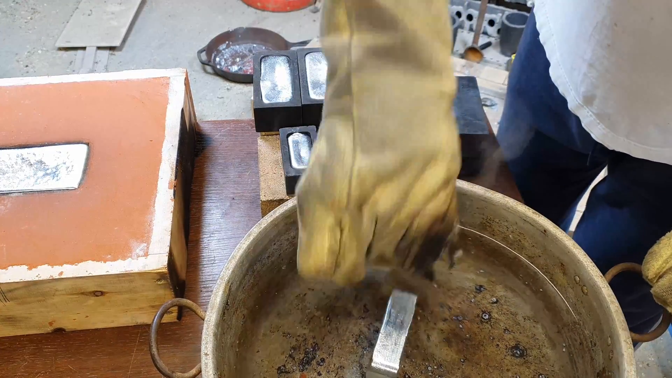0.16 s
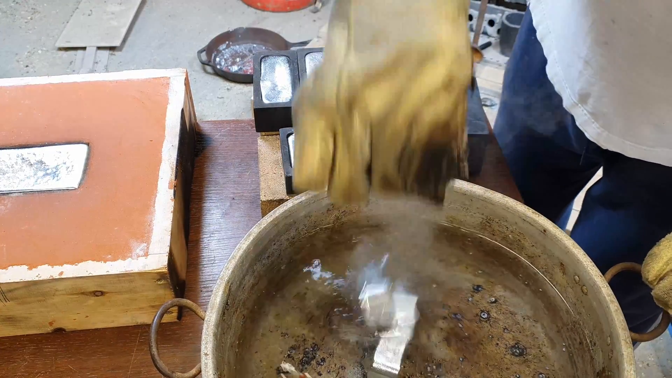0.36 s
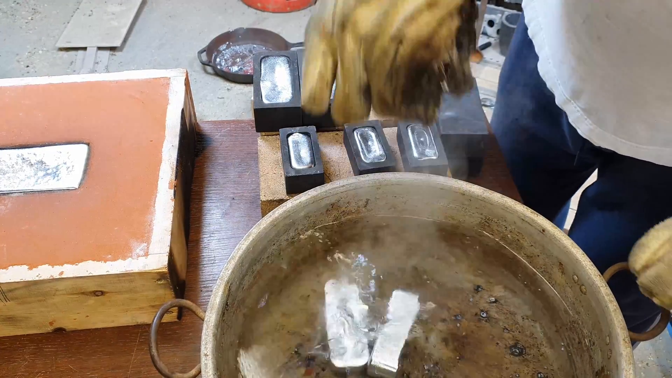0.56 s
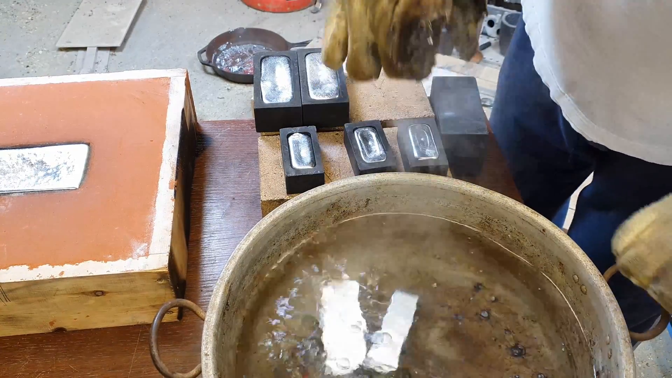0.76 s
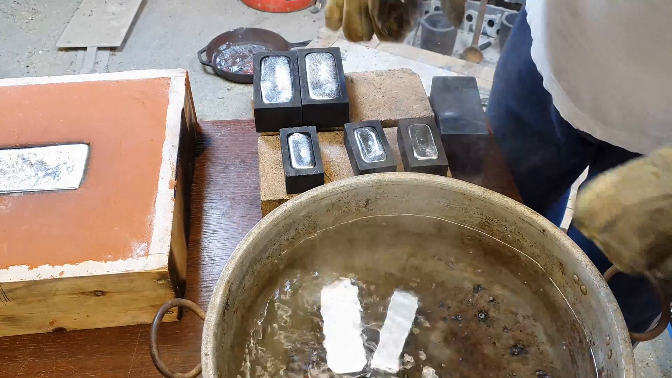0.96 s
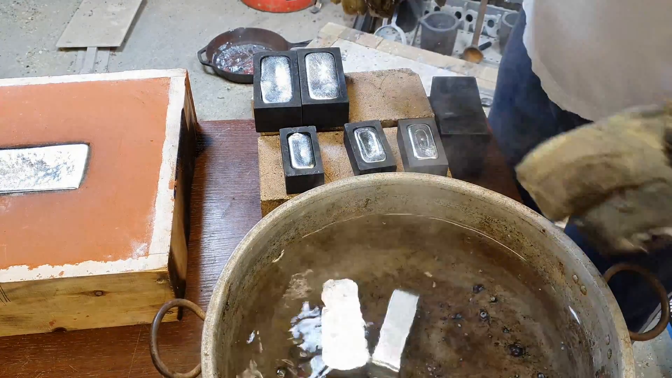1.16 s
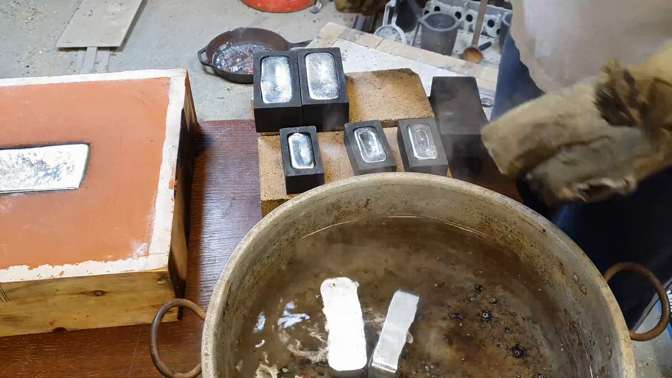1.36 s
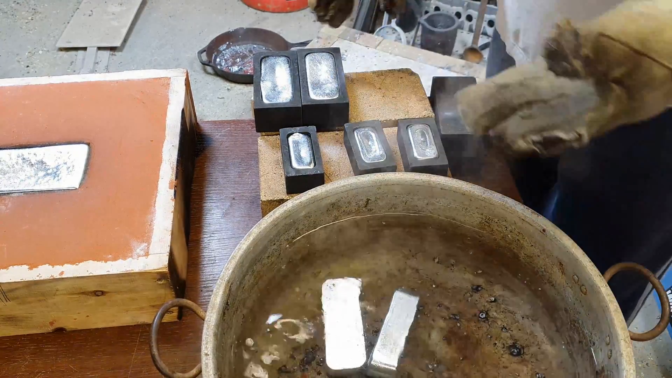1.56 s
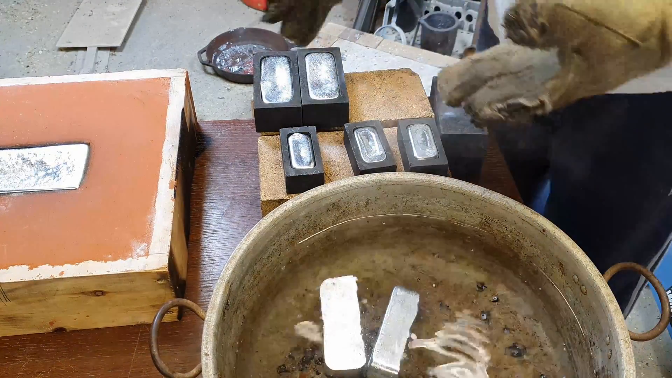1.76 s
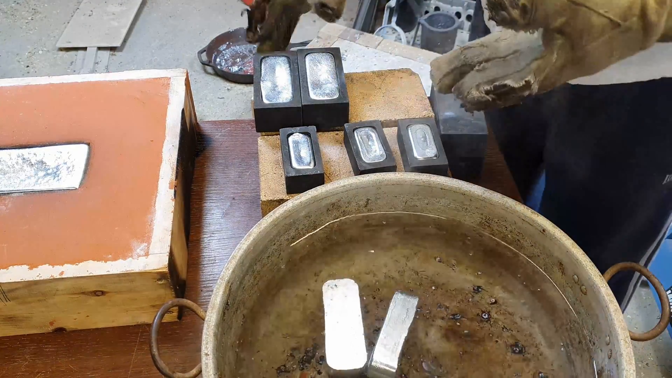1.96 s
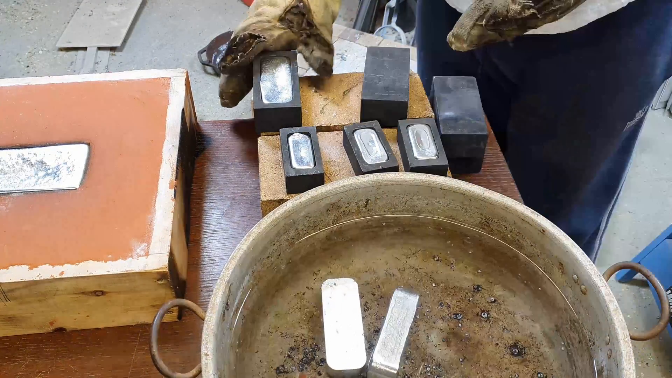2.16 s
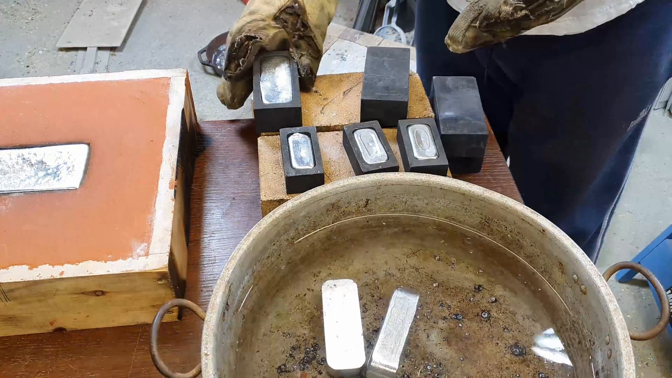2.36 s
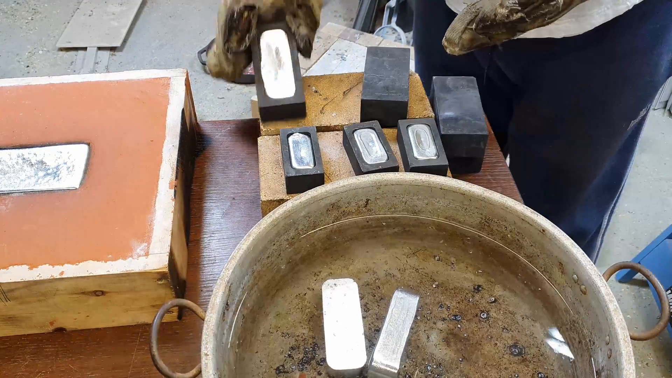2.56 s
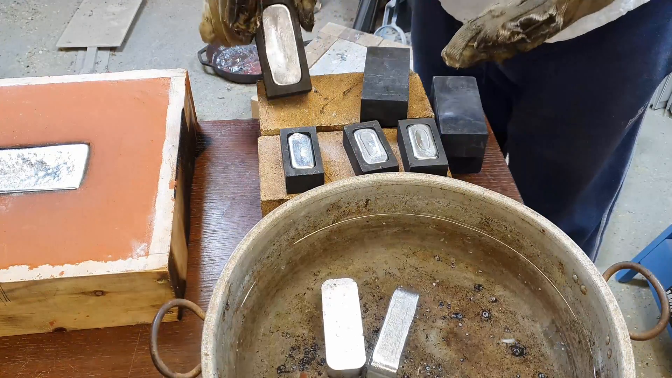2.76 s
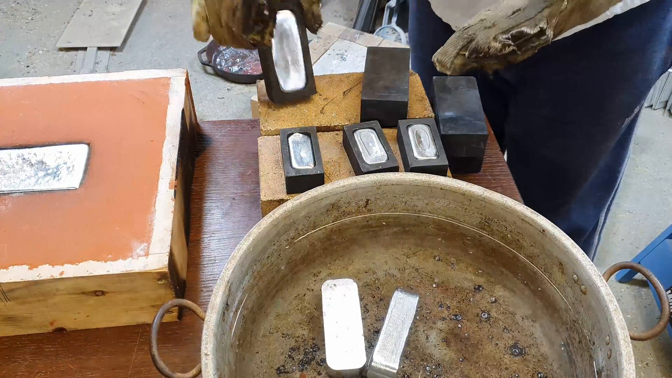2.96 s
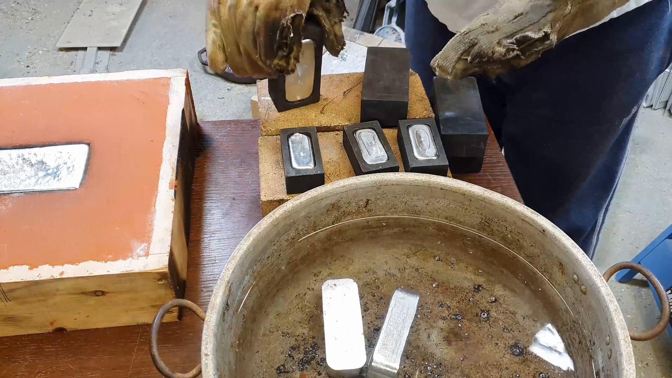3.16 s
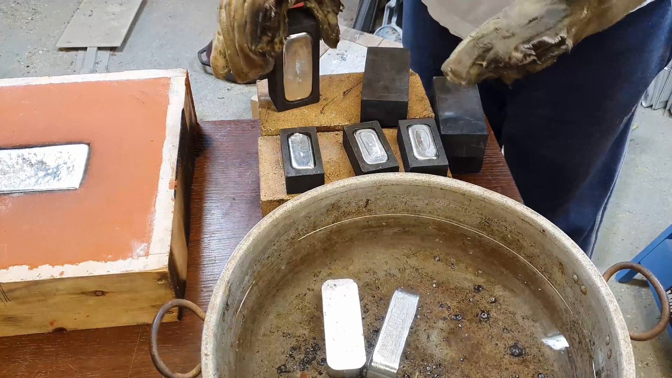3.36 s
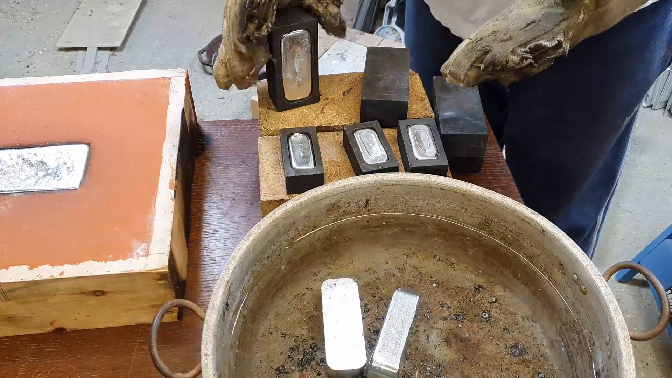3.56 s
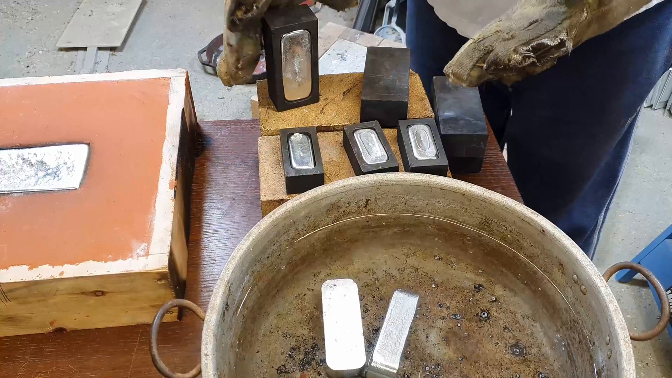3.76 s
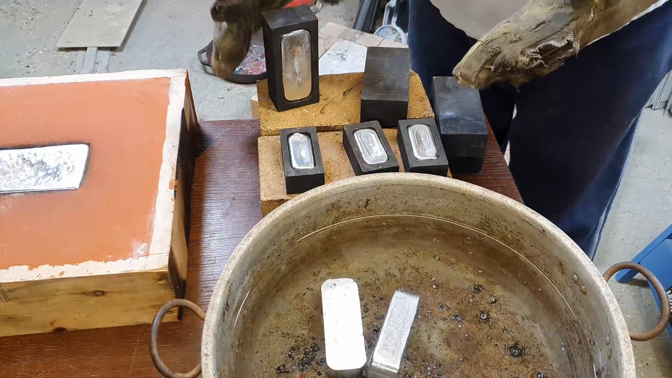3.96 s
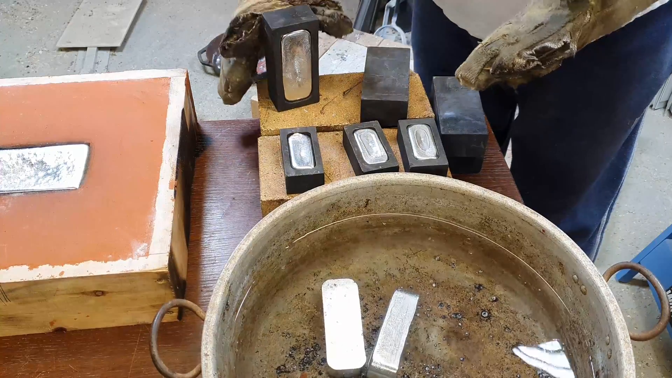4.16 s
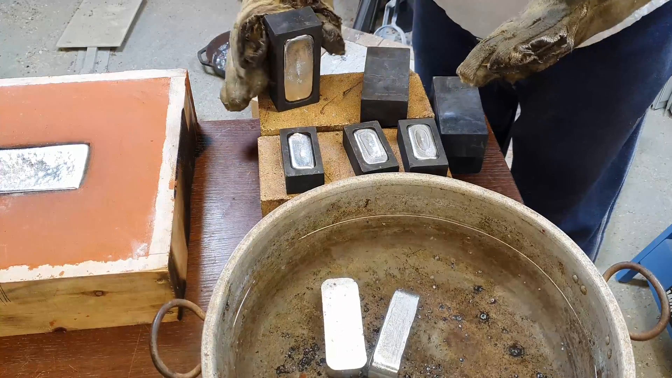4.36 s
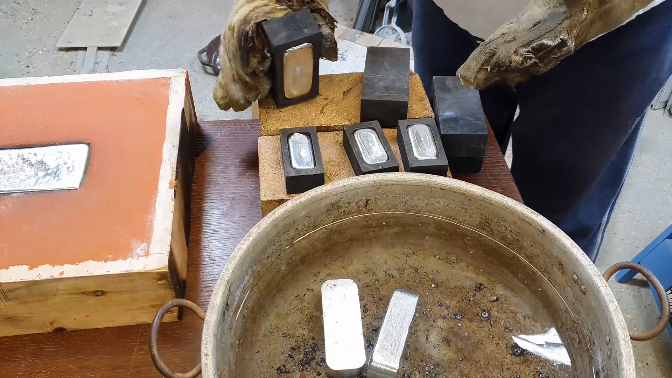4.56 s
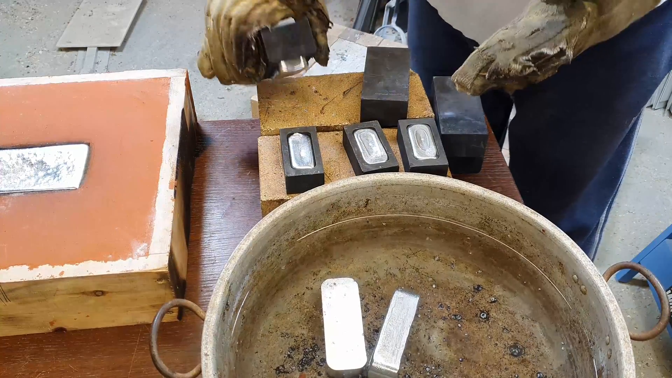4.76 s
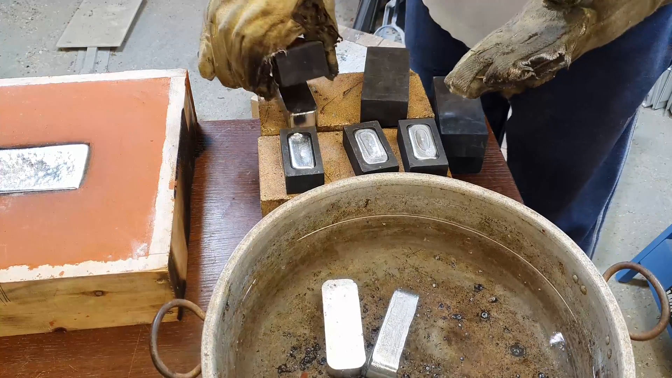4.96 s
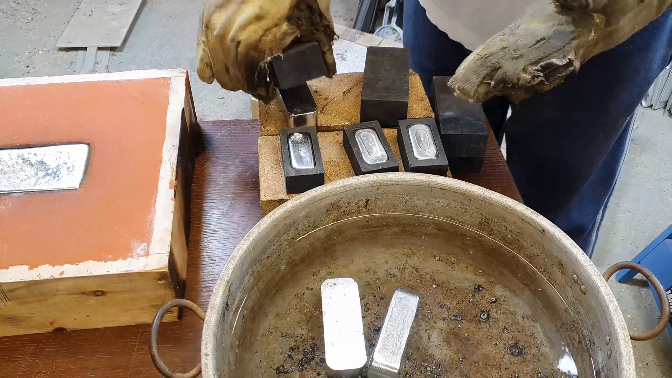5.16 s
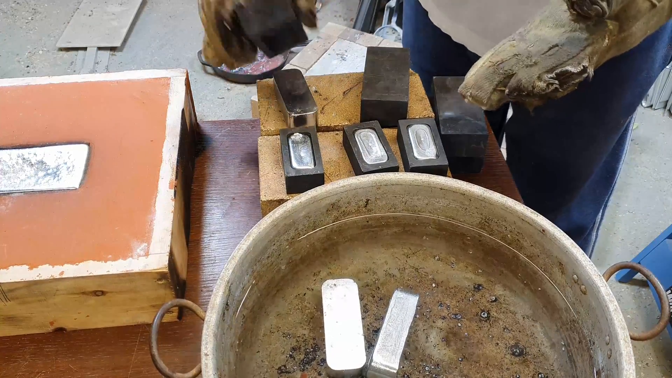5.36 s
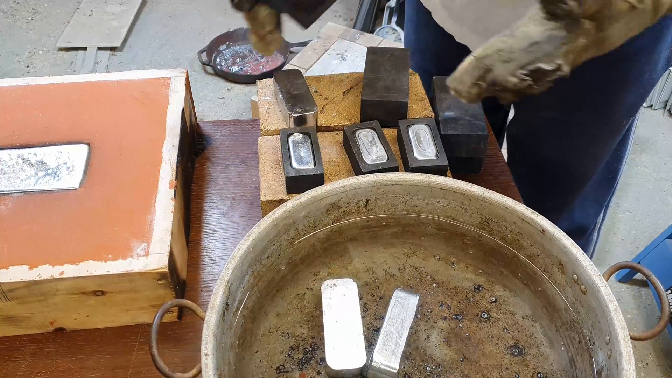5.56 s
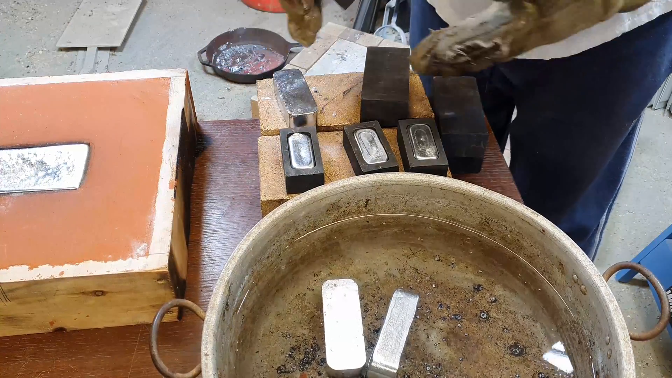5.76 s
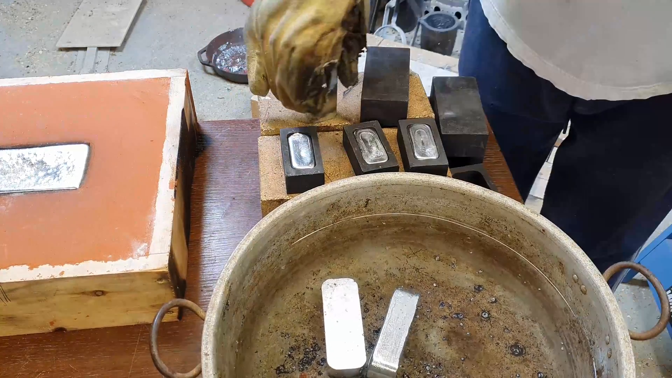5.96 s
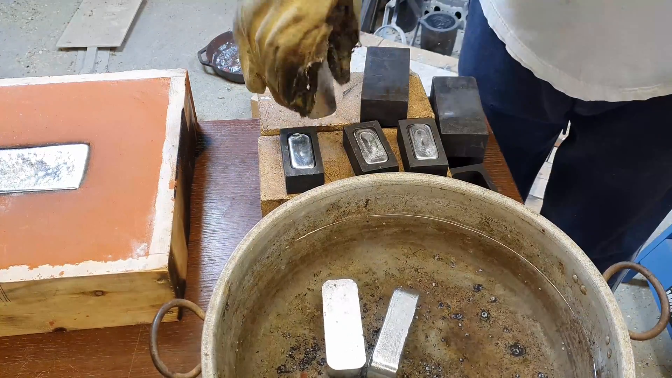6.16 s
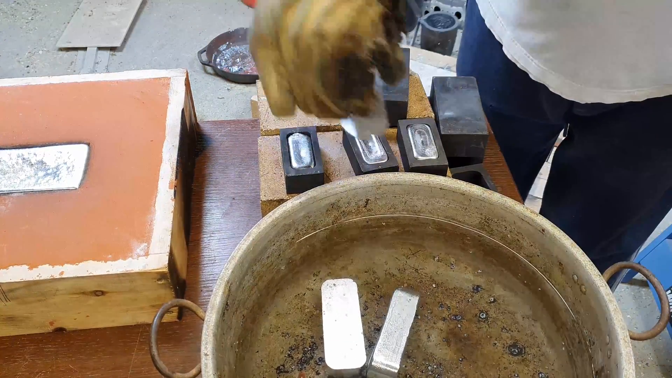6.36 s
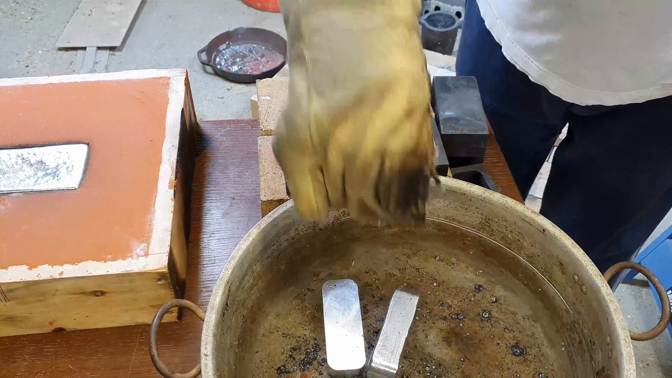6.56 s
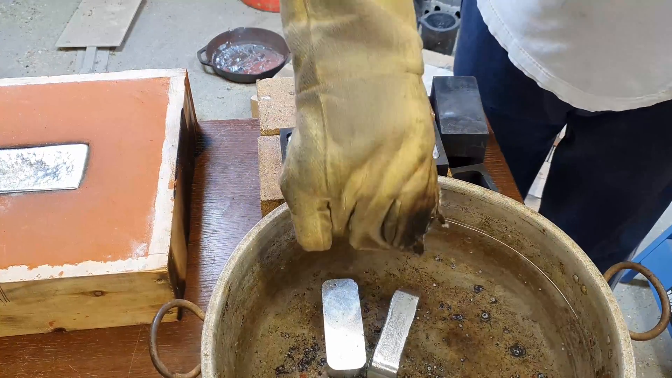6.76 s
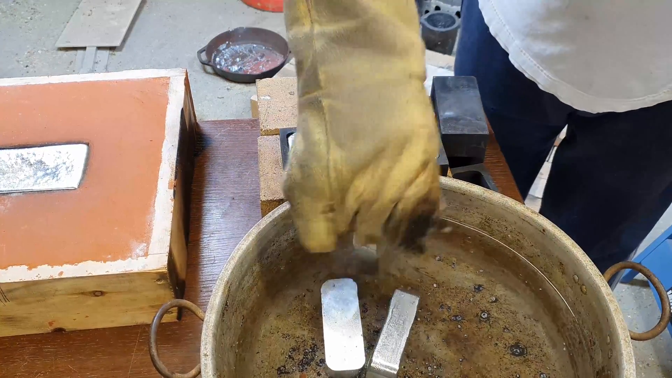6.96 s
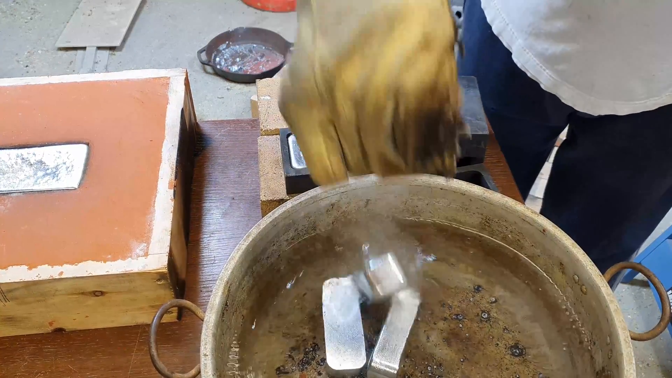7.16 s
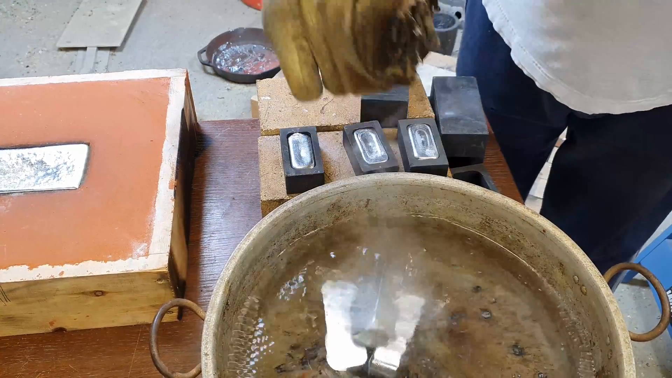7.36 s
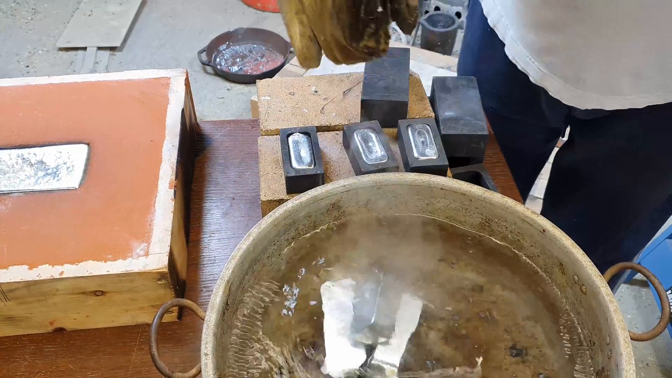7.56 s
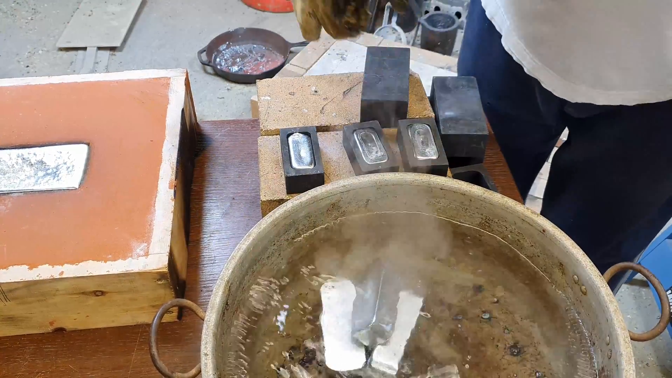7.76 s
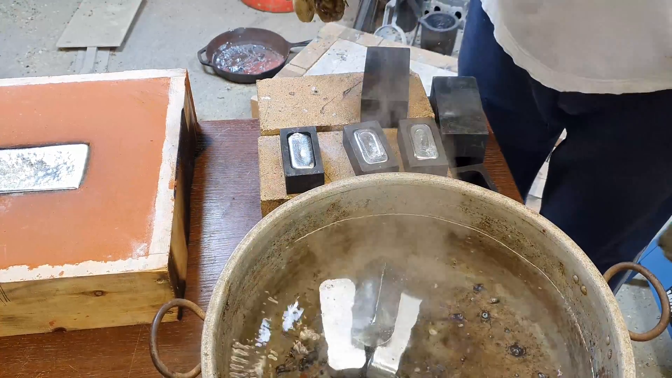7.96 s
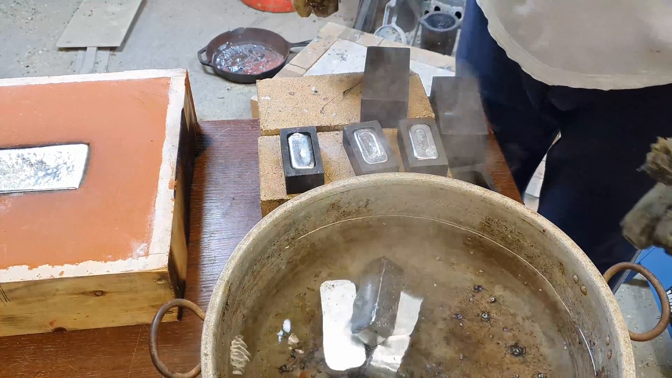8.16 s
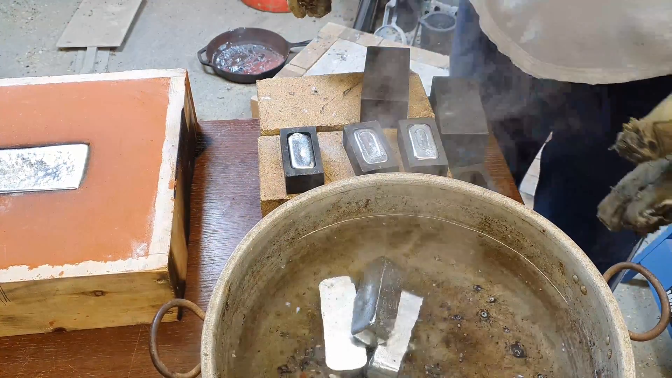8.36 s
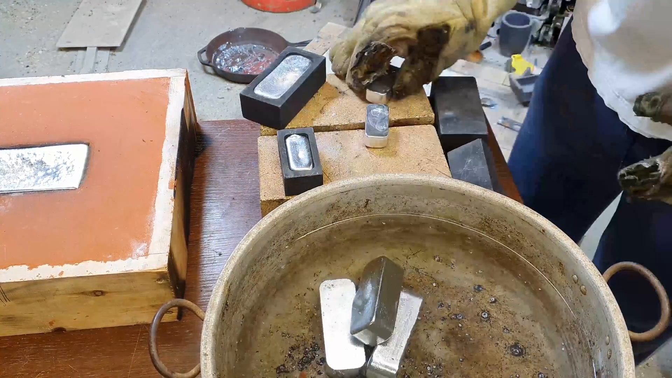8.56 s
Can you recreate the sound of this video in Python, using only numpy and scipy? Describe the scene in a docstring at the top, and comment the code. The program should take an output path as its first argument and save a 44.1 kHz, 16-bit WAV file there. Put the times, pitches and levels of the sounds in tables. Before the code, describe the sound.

Close stereo pickup at a workshop bench. Bright steam fizz and watery bubbling surround several dull metallic bumps on a pot floor, fading within two seconds. Gloved hands then rustle and drag a casting mould with brief gritty scrapes and low rumble; a hard crack knocks the next ingot loose. After a quiet pause it plunges in, clunking and sizzling, then simmering with tiny spits over a faint drone.

```python
"""Two hot ingots are dropped into a pot of water in a workshop: steam fizzes, bubbles boil, metal bumps the
pot. Between them gloved hands drag a casting mould over bricks and knock the next ingot out; each quench stops
short. Fizz, simmer, slosh, rumble and rustle are coloured noise; bubbles are short rising tones. Bumps and
knocks ring decaying modes with a noise crack; grit excites the mould's resonances. Beneath lie a faint drone
and a low hum that drifts in level; a deep boom rises from the low band under the hard knock."""
import sys
import numpy as np
from scipy import signal
from scipy.fft import rfft, irfft, next_fast_len
from scipy.io import wavfile
from scipy.ndimage import uniform_filter1d

SR = 44100
rng = np.random.default_rng(int(sys.argv[2]) if len(sys.argv) > 2 else 0)


def generate_wav(signal):
    """Clip the signal to [-1, 1] and save it as 16-bit WAV at the path in sys.argv[1]."""
    frames = np.transpose(np.atleast_2d(signal))
    scaled = np.clip(frames, -1, 1) * 32767
    pcm = np.round(scaled).astype(np.int16)
    wavfile.write(sys.argv[1], SR, pcm)


N = 378819
T = np.arange(N) / SR
FAST = next_fast_len(N)
HZ = np.fft.rfftfreq(FAST, 1 / SR)

# one table a quench: (time [s], steam fizz [dB], simmer [dB], large bubbles [dB])
QUENCHES = [
    [(0.0, -35.5, -34, -42.5), (0.15, -34.5, -36.5, -38.5), (0.33, -30.5, -35.5, -39.5),
     (0.44, -33.5, -38, -46.5), (0.51, -27, -35.5, -45), (0.58, -36, -24.5, -38.5), (0.62, -45, -31, -34),
     (0.84, -64, -36.5, -49), (1.18, -59, -40, -47), (1.6, -59, -46.5, -65), (2.14, -55.5, -55.5, -60.5)],
    [(6.802, -58.5, -58, -82.5), (6.824, -37, -42, -65), (6.87, -34, -34, -46), (6.98, -29.5, -30.5, -41),
     (7.07, -34.5, -31, -32.5), (7.19, -31, -35.5, -37.5), (7.485, -35.5, -36, -44),
     (7.53, -48, -38, -42.5), (7.72, -59, -40.5, -48), (8.03, -69, -45.5, -48.5),
     (8.48, -100, -54.5, -49.5)],
]
# ingot against the pot floor: (time [s], dry peak [dB], centre [Hz], breadth [octaves],
# slosh it stirs [dB], steam it frees [dB])
BUMPS = [(.151, -13, 770, 1.5, -51, -50), (.159, -6.5, 570, 2.26, -40, -45),
         (0.395, -24, 240, 2.7, -35.5, -43), (.506, -17, 790, 4.6, -33.5, -27),
         (0.539, -29, 239.7, 1.5, -30.5, -42), (0.556, -27.5, 438, 0.54, -50, -47),
         (.578, -13, 561, 1.9, -39, -52), (.642, -16.5, 307, 1.4, -42, -50),
         (0.861, -19.5, 296.2, 2.2, -38.5, -42.5), (1.163, -29.5, 307, 3.5, -56, -79),
         (1.259, -23.5, 440, 2.7, -60, -65), (1.385, -31.5, 640, 1.1, -54, -66),
         (1.489, -28.5, 700, 1.5, -50, -47), (1.541, -33, 270, 1.5, -55.5, -56),
         (1.69, -35.5, 616, 0.56, -53.5, -58), (1.9234, -22, 798, 1.6, -47, -45),
         (7.037, -18, 443, 0.7, -55, -39), (7.0509, -8.5, 780, 2, -31, -50),
         (7.338, -12, 625, 3.5, -39, -30), (7.405, -18, 810, 1.54, -63, -35.5)]
# background: (time [s], drone [dB], low hum [dB])
AIR_LEVELS = [
    [(2.15, -68, -69), (2.6, -72.5, -71), (2.86, -63, -60), (3.07, -64.5, -65.5), (3.28, -70.5, -65),
     (3.77, -68.5, -68), (4.15, -73.5, -66), (4.55, -71, -68.5), (4.72, -63.5, -67), (4.94, -73, -77),
     (5.03, -73, -59.5), (5.34, -67.5, -63.5), (5.6, -71.5, -61.5), (5.85, -75.5, -68), (6.3, -76.5, -71),
     (6.79, -76, -73)],
]


def quench():
    """Hot ingots in water: steam, boiling, slosh, bumps and spits, sounding only while a quench runs."""
    time_s, puff_db = np.transpose(BUMPS)[[0, 5]]
    heat = gain_of(column(QUENCHES, index=2))
    puffs = swells(time_s, 0, puff_db, rise_s=0.0097, fall_db_per_s=345.5)
    steam = np.hypot(gain_of(column(QUENCHES, index=1)), puffs)
    wet = fizz(steam) + boil(heat, steam) + slosh(heat)
    return (wet + bumps() + spits()) * during(QUENCHES)


def fizz(steam):
    """Escaping steam as bright noise; each bump frees a puff more."""
    # (frequency [Hz], relative level [dB per Hz])
    fizz_colour = [(180, -56.5), (300, -36.5), (592, -3), (896, -13), (1010, -12), (1090, 1.5),
                   (1430, -36.5), (2020, -25.5), (2270, -6), (2550, 6.5), (15800, -4)]
    return steam * noise(fizz_colour, patchy_db=1.4, flicker_db=0.4)


def boil(heat, steam):
    """Simmer under water, with small bubbles that emerge as the steam dies down, and large bubbles."""
    # one spectrum a quench: (frequency [Hz], relative level [dB per Hz])
    simmer_colours = [
        [(530, -33.5), (900, -2), (979, -8.5), (1210, -2.5), (1540, -3), (1660, -13.5), (1870, -6), (2780, -7),
         (4380, -14.5), (6060, -20.5), (6590, -21), (7700, -27), (11000, -29), (15800, -52)],
        [(530, -33.5), (900, -6.5), (1000, -13.5), (1170, -13.5), (1350, -5), (1540, -30.5), (1680, -7.5),
         (2060, -11.5), (2680, -14.5), (4080, -20), (5500, -30.5), (7790, -41), (8780, -40), (15800, -68)],
    ]
    # sizes of small bubbles each ingot sheds, one row a quench: (pitch [Hz], pitch [Hz])
    small_hz = [
        [1453, 1700],
        [1368, 1950],
    ]
    simmer, small = 0, 0
    for rows, colour, sizes in zip(QUENCHES, simmer_colours, small_hz):
        simmer += during([rows]) * noise(colour, patchy_db=1.73, flicker_db=0.77)
        for hz in sizes:
            small += during([rows]) * bubbles(hz, octaves=.08, cycles=26.0, per_s=500, uneven_db=3)
    large = bubbles(720, octaves=.9, cycles=4.2, per_s=810, uneven_db=0.5)
    clear_of_steam = heat / np.hypot(heat, steam)
    small_gain = gain_of(-5) * clear_of_steam  # against the simmer
    return heat * (simmer + small_gain * small) + gain_of(column(QUENCHES, index=3)) * large


def slosh(heat):
    """Low water noise: each bump stirs a swell, and rocking keeps it going once the ingot reaches the floor."""
    # (frequency [Hz], relative level [dB per Hz])
    slosh_colour = [(18, -59.5), (30, -31.5), (86, 4.5), (122, -2.5), (155, -13), (226, 2), (397, -5),
                    (444, -8), (600, -3.5), (780, -40.5), (1320, -120)]
    time_s, stir_db = np.transpose(BUMPS)[[0, 4]]
    landed = 0
    for rows in QUENCHES:
        first_bump_s = time_s[time_s > rows[0][0]][0]
        landed = landed + during([rows]) * (T > first_bump_s)
    rocking = gain_of(-14) * heat * landed  # against the simmer
    stirred = swells(time_s, 0.024, stir_db, rise_s=0.015, fall_db_per_s=131)
    return np.hypot(rocking, stirred) * noise(slosh_colour, patchy_db=1.5, flicker_db=1.0)


def bumps():
    """Ingot hits the pot floor: pot modes ring and a dull crack spreads under water."""
    # (frequency [Hz], relative level [dB], t60 [s])
    pot_modes = [(85.05, -7.5, 0.18), (266.5, -1.5, 0.08), (427, -6, 0.063), (567, -3, 0.04),
                 (640, -1.5, 0.035), (760, 4, 0.032), (884.6, -4.5, 0.074), (1006, -3.5, 0.045),
                 (1500, -10.5, 0.075), (2350, -9.5, .03)]
    # crack under water: (frequency [Hz], relative level [dB per Hz])
    splash_colour = [(80, -2), (700, -1.5), (2500, -6.5), (5000, -21), (15000, -42.5)]
    events = [row[:4] for row in BUMPS]
    hits = strike(events, pot_modes, splash_colour, crack_db=-13, crack_t60=0.026, rise_ms=0.5)
    return room(hits, wet_db=-4.5)


def spits():
    """Droplets spitting at the surface, each a short decaying burst of bright noise."""
    # (time [s], initial level before band filter [dB], pitch [Hz])
    droplets = [(7.688, -59, 13500), (8.037, -56, 12500), (8.054, -52, 12000), (8.147, -56, 8000),
                (8.195, -57, 13000), (8.267, -59, 8000)]
    out, u = np.zeros((2, N + 900)), np.arange(900) / SR
    puffs = rng.standard_normal((len(droplets), 2, 900))
    for (time_s, db, hz), puff in zip(droplets, puffs):
        band_hz = [0.52 * hz, min(1.4 * hz, 18000)]
        band = signal.butter(2, band_hz, "band", fs=SR, output="sos")
        start = round(time_s * SR)
        out[:, start:start + 900] += gain_of(db - 60 * u / 0.033) * signal.sosfilt(band, puff)
    return out[:, :N]


def handling():
    """Mould, bench and gloves between quenches, plus the knocks."""
    # bench: (frequency [Hz], relative level [dB per Hz])
    rumble_colour = [(35, -26.5), (60, -15.5), (103, 0), (146, -14.5), (254, -9), (350, -13), (401, -8.5),
                     (497, -24.5), (554, -12), (1000, -38), (1500, -30), (1950, -60.5), (3300, -120)]
    # gloves: (frequency [Hz], relative level [dB per Hz])
    rustle_colour = [(500, -29.5), (1200, 5.5), (2200, 0), (3200, -0.5), (4400, -6), (5600, -12.5),
                     (7000, -12.5), (9000, -17), (12500, -21), (13500, -26.5), (15800, -30)]
    rumble = effort(index=2) * noise(rumble_colour, patchy_db=1.5, flicker_db=1.5)
    rustle = effort(index=3) * noise(rustle_colour, patchy_db=1.5, flicker_db=1.0)
    return (mould() + rumble + rustle) * (1 - during(QUENCHES)) + knocks()


def knocks():
    """Mould and ingot strike the bricks: bench modes ring with a hard crack."""
    # (time [s], dry peak [dB], centre [Hz], breadth [octaves])
    blows = [(2.433, -53.5, 330, 0.72), (3.1325, -24.5, 330, 0.86), (4.625, -54.5, 300, 1.4),
             (4.834, -51, 578, 0.98), (4.966, -25.5, 751, 1.4), (4.9965, -6.5, 1100, 3.7),
             (5.0035, -20, 385, 2.3), (5.921, -68, 1500, 2.4), (6.097, -59.5, 321, 0.49)]
    # (frequency [Hz], relative level [dB], t60 [s])
    bench_modes = [(124, -5, 0.12), (176.5, -4, 0.056), (222.5, -5.5, 0.21), (257.2, -5.5, 0.027),
                   (330, -1.5, 0.071), (420, -2.5, 0.06), (566.5, -0.5, 0.057), (780, -10, 0.027),
                   (984, -10.5, 0.0083), (1754, -2.5, .02), (2410, -3.5, 0.027), (3553, -9.5, .07),
                   (7800, -34, 0.017)]
    # crack on brick: (frequency [Hz], relative level [dB per Hz])
    crack_colour = [(47, -41), (80, -20.5), (119, 1.5), (471, -7), (503, -15), (550, 0), (684, -13),
                    (747, -17.5), (1500, -13), (1790, -17.5), (2440, -14.5), (5850, -32), (15000, -55.5)]
    hits = strike(blows, bench_modes, crack_colour, crack_db=2.5, crack_t60=0.011, rise_ms=0.65)
    return room(hits, wet_db=2.0)


def mould():
    """Grit under the sliding mould ticks its modes; the main mode's pitch changes from one drag to the next."""
    # main mode: (time [s], frequency [Hz])
    main_hz = [(2.9, 3880), (3.05, 3720), (4.55, 3920), (4.65, 3900), (4.75, 3660), (5.3, 3630),
               (8.5, 3600)]
    # other modes: (frequency [Hz], width per smoothing pole [Hz], relative level [dB])
    other_modes = [(2188, 160, 13.5), (2560, 110, -3.5), (4290, 140, 7), (6440, 105, -5.5), (6960, 210, 6),
                   (8800, 280, 0.5), (9885, 270, -2), (12500, 500, -5.5)]
    tick_size = gain_of(1.5 * rng.exponential(1, (2, N)))
    tick_sign = rng.choice([-1., 1.], (2, N))
    grit = tick_size * tick_sign * (rng.random((2, N)) < 6000 / SR)  # 6000 ticks per s
    main = evened(resonate(grit, column([main_hz], index=1), width_hz=340))
    others = evened(sum(gain_of(db) * resonate(grit, hz, width_hz) for hz, width_hz, db in other_modes))
    return spread(*(effort(index=0) * main + effort(index=1) * others))


def effort(index):
    """Gain of one handling layer: moves over a faint steady background whose level follows the drone."""
    # gloved hands drag or shift the mould: (start [s], hold [s], main mould mode [dB],
    # other mould modes [dB], bench rumble [dB], glove rustle [dB])
    moves = [(2.17, .05, -99.5, -92.5, -75.5, -78.5), (2.42, .02, -95, -105, -67.5, -87.5),
             (2.527, .04, -73, -81, -59, -72.5), (2.588, 0.18, -65, -65, -49, -64.5),
             (2.793, .12, -90.5, -87, -51, -93), (2.98, .1, -82, -78, -81, -67.5),
             (3.1, .09, -87, -79.5, -71.5, -61), (3.478, .04, -89.5, -85.5, -83.5, -79),
             (3.56, .02, -94.5, -96.5, -87, -89.5), (4.22, .04, -90, -99, -84.5, -86),
             (4.58, .01, -74, -76, -66.5, -93.5), (4.718, .17, -85.5, -86.5, -72.5, -90.5),
             (5.269, .14, -76.5, -108, -64, -92), (5.468, 0.096, -89, -108, -76, -92),
             (5.9, .05, -103, -94, -73.5, -91), (6.05, 0.051, -101, -103, -73, -98),
             (8.465, .1, -72, -99, -61, -65.5)]
    # fall rate: (main mode [dB/s], other modes [dB/s], rumble [dB/s], rustle [dB/s])
    fall_db_per_s = (150, 170, 120, 140)
    # background against the drone: (main mode [dB], other modes [dB], rumble [dB], rustle [dB])
    floor_db = (-27, -39.5, -12, -17.5)
    rows = np.transpose(moves)
    floor = gain_of(column(AIR_LEVELS, index=1) + floor_db[index])
    active = swells(rows[0], rows[1], rows[2 + index], rise_s=0.031, fall_db_per_s=fall_db_per_s[index])
    return np.hypot(floor, active)


def air():
    """Noise shaped into a faint drone and a low hum that drifts in level; the low band also carries the deep
    boom of the hard knock."""
    # (frequency [Hz], relative level [dB per Hz])
    drone_colour = [(71, -40.5), (120, -9), (141, -2.5), (200, -15.5), (235, -19), (409, -25.5),
                    (511, -4.5), (653, -10.5), (695, -1.5), (983, 1), (1340, -12.5), (3940, -34),
                    (6050, -32.5), (12100, -35.5), (15800, -45)]
    # (frequency [Hz], relative level [dB per Hz])
    hum_colour = [(20, -20.5), (40, 3), (65, 5), (90, -2.5), (130, -29), (200, -57.5)]
    drone = gain_of(column(AIR_LEVELS, index=1)) * noise(drone_colour, patchy_db=0.5, flicker_db=0.84)
    hum = gain_of(column(AIR_LEVELS, index=2)) * noise(hum_colour, patchy_db=-4.5, flicker_db=-1.5)
    return drone + hum


def noise(colour, patchy_db, flicker_db):
    """Random short-time spectra with drifting patches and a flicker shared by all bands; rms 1."""
    frames, hop = N // 128 + 5, 128
    patches = uniform_filter1d(rng.standard_normal((257, frames)), 5, 0)
    patches = evened(uniform_filter1d(patches, 20, 1))
    flicker = evened(uniform_filter1d(rng.standard_normal(frames), 3))
    z = rng.standard_normal((2, 257, frames)) + 1j * rng.standard_normal((2, 257, frames))
    z *= gain_of(patchy_db * patches + flicker_db * flicker)
    white = signal.istft(z, nperseg=512, noverlap=512 - hop)[1][:, :N]
    coloured = irfft(rfft(white, FAST) * gain_of(read(colour, HZ)), FAST)[:, :N]
    return evened(spread(*coloured))


def bubbles(centre_hz, octaves, cycles, per_s, uneven_db):
    """Short tones rising in pitch, in six sizes, each size with its own random train; rms 1."""
    out, u = np.zeros((2, N)), np.arange(1200) / SR
    size = gain_of(uneven_db * np.minimum(rng.exponential(1, (2, N)), 5))
    size = size * (rng.random((2, N)) < per_s / SR)
    kind = rng.integers(0, 6, (2, N))
    for k, step in enumerate(np.linspace(-1, 1, num=6)):
        turns = centre_hz * 2 ** (octaves * step) * u
        envelope = gain_of(-9 * step ** 2) * turns * np.exp(-3 * turns / cycles)
        tone = envelope * np.sin(2 * np.pi * turns * (1 + .004 * turns))
        out += signal.oaconvolve(size * (kind == k), tone[None], axes=1)[:, :N]
    return evened(spread(*out))


def strike(events, modes, colour, crack_db, crack_t60, rise_ms):
    """Each blow rings the modes around its centre and throws a short noise crack; breadth sets their spread."""
    out, u = np.zeros(N + SR), np.arange(16384) / SR
    bins = np.fft.rfftfreq(len(u), 1 / SR)
    puffs = rng.standard_normal((len(events), len(u)))
    for (time_s, db, centre_hz, octaves), puff in zip(events, puffs):
        def favour(hz):
            return gain_of(-6 * (np.log2((hz + 1) / centre_hz) / max(octaves, .3)) ** 2)
        ring = np.zeros(len(u))
        for hz, level_db, t60 in modes:  # all start together
            ring -= favour(hz) * gain_of(level_db - 60 * u / t60) * np.sin(2 * np.pi * hz * u)
        crack = evened(irfft(rfft(puff) * favour(bins) * gain_of(read(colour, bins))))
        blow = ring / abs(ring).max() + gain_of(crack_db - 60 * u / crack_t60) * crack
        blow *= 1 - np.exp(-(1000 * u / rise_ms) ** 2)
        out[round(time_s * SR):][:len(u)] += gain_of(db) * blow / abs(blow).max()
    return out[:N]


def resonate(x, hz, width_hz):
    """Resonance: shift the curve hz down to zero, smooth twice, shift back."""
    turn = np.exp(2j * np.pi * np.cumsum(hz * np.ones(N)) / SR)
    r = np.exp(-np.pi * width_hz / SR)
    once = signal.lfilter([1 - r], [1, -r], x / turn)
    return (turn * signal.lfilter([1 - r], [1, -r], once)).real


def room(x, wet_db):
    """Direct sound plus sparse taps of random sign, each band dying at its own speed."""
    # (frequency [Hz], t60 [s])
    decay = [(80, 0.52), (200, 0.37), (1000, 0.33), (3000, 0.42), (6000, 0.25), (9000, 0.32), (14000, 0.34)]
    taps = np.zeros((2, SR))
    at = np.arange(140, SR - 20, 20) + rng.integers(0, 20, (2, (SR - 141) // 20))
    np.put_along_axis(taps, at, rng.choice([-1., 1.], at.shape), 1)
    hz, t, z = signal.stft(taps, SR, nperseg=256)
    tail = signal.istft(z * gain_of(-60 * t / read(decay, hz)[:, None]), SR, nperseg=256)[1]
    tail[:, :140] = 0
    tail = tail / np.linalg.norm(tail[0])
    return x + gain_of(wet_db) * spread(*signal.fftconvolve(x[None], tail, axes=1)[:, :N])


def spread(left, other):
    """Two microphone ports: alike in the bass, little related in the treble, where the lag blurs out."""
    # (frequency [Hz], left-right likeness [0 to 1])
    likeness = [(60, 0.9), (110, 1), (200, 0.94), (380, 0.82), (700, 0.81), (1290, 0.43), (2380, 0.15),
                (4400, 0.4), (8120, 0.42), (15000, 0.064)]
    lag_s = 3 / SR  # right after left, in the bass
    same = np.clip(read(likeness, HZ), 0, 1)
    late = np.exp(-2j * np.pi * HZ * lag_s / (1 + (HZ / 3000) ** 4))
    right = same * late * rfft(left, FAST) + np.sqrt(1 - same ** 2) * rfft(other, FAST)
    return np.array([left, irfft(right, FAST)[:N]])


def swells(starts, holds, levels_db, rise_s, fall_db_per_s):
    """Gain of events that each rise, hold and die away; powers add."""
    t = T[::64, None] - np.asarray(starts)
    fall_db = fall_db_per_s * np.maximum(t - rise_s - holds, 0)
    each = np.clip(t / rise_s, 0, 1) ** 2 * gain_of(np.asarray(levels_db) - fall_db)
    return np.interp(T, T[::64], np.linalg.norm(each, axis=1))


def during(tables, ramp_s=.004):
    """1 while any of the tables runs, else 0, with short ramps."""
    gate = 0
    for rows in tables:
        inside_s = np.minimum(T - rows[0][0] + ramp_s, rows[-1][0] + ramp_s - T)
        gate = gate + np.clip(inside_s / ramp_s, 0, 1)
    return gate


def column(tables, index):
    """One control over time, interpolated through all tables."""
    rows = np.concatenate(tables)
    return np.interp(T, rows[:, 0], rows[:, index])


def read(points, hz):
    """Reads a spectrum on a log-frequency axis."""
    f, value = np.transpose(points)
    return np.interp(np.log(hz + 1), np.log(f + 1), value)


def gain_of(db):
    """Decibels to gain."""
    return 10 ** (np.asarray(db) / 20)


def evened(x):
    """Scales to rms 1."""
    return x / np.sqrt(np.mean(x ** 2) + 1e-30)


def scene():
    """Everything at the microphone."""
    return quench() + handling() + air()


def record(dry):
    """The ports lean left or right by band and lose the deepest bass; then the band limit."""
    # (frequency [Hz], left minus right [dB])
    balance = [(60, 0), (110, -1), (200, 0), (380, 0), (700, 1), (1290, 1), (2380, 0), (4400, 3),
               (8120, 0.5), (15000, -2)]
    lean_gain = gain_of(np.outer([.5, -.5], read(balance, HZ)))
    lean = irfft(rfft(dry, FAST) * lean_gain, FAST)[:, :N]
    thin = signal.sosfilt(signal.butter(4, 48, "high", fs=SR, output="sos"), lean)
    band_limit = signal.firwin(1023, 15750, window=("kaiser", 10), fs=SR)
    return signal.oaconvolve(thin, band_limit[None], "same")


dry = scene()
out = record(dry)
generate_wav(out)
```